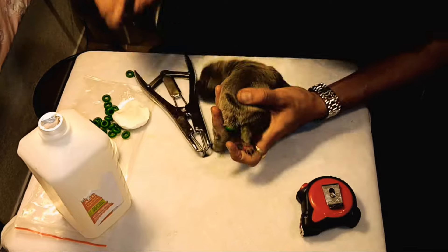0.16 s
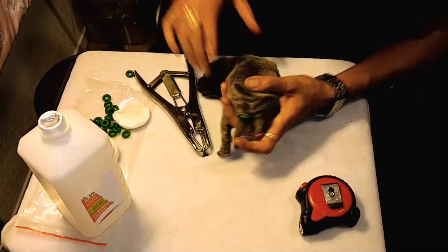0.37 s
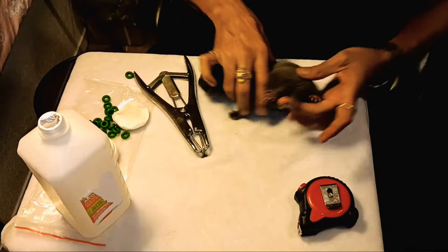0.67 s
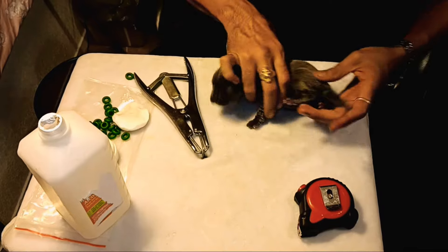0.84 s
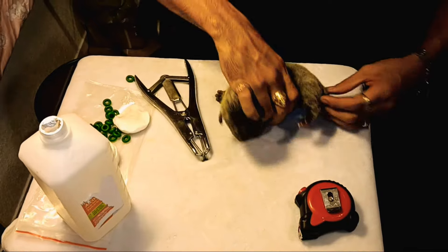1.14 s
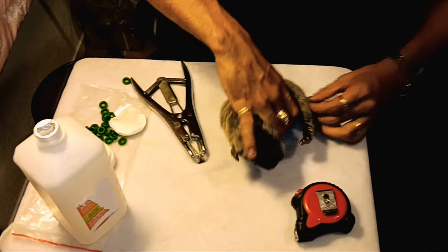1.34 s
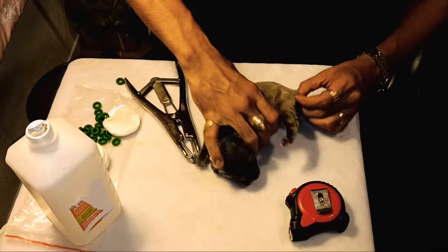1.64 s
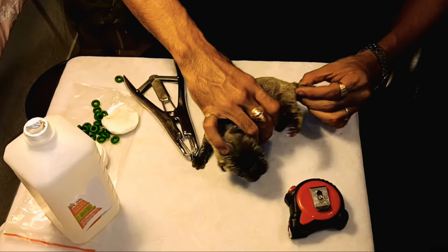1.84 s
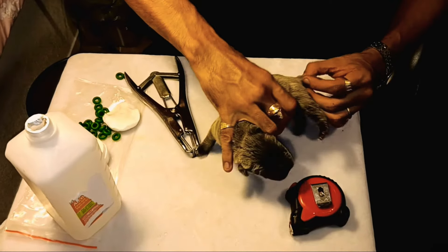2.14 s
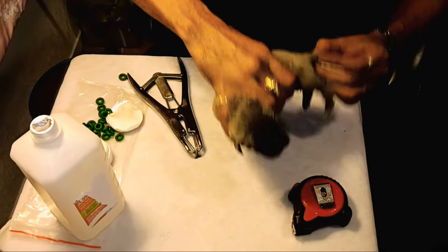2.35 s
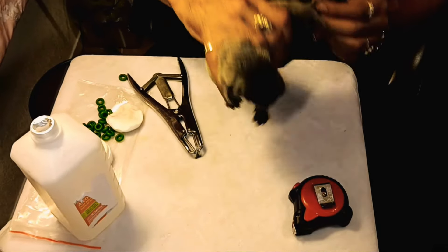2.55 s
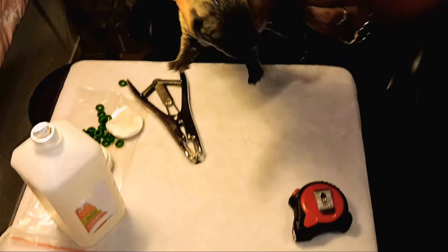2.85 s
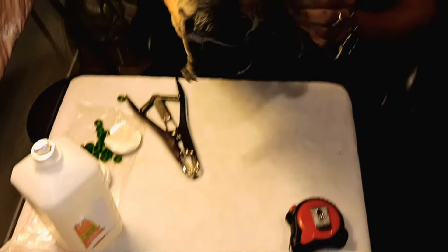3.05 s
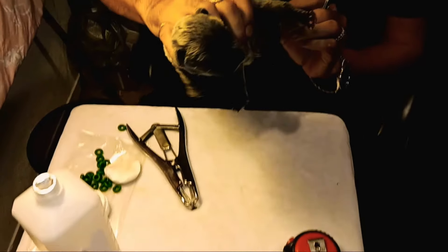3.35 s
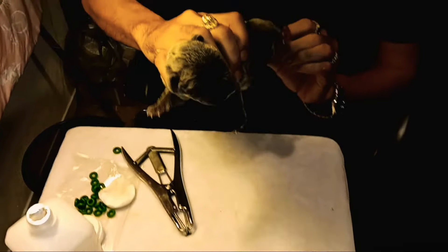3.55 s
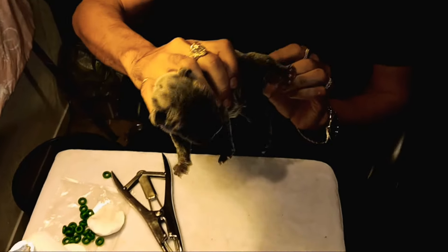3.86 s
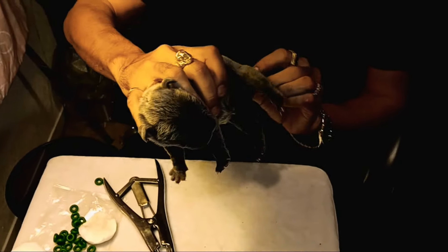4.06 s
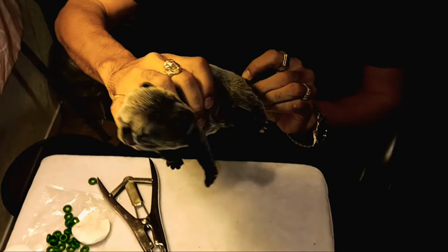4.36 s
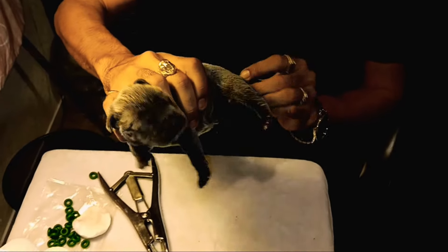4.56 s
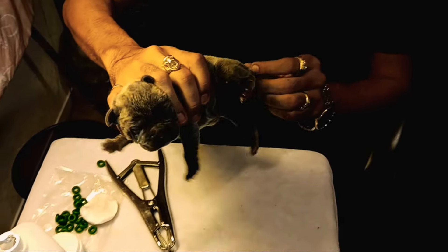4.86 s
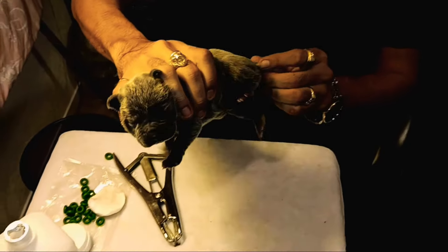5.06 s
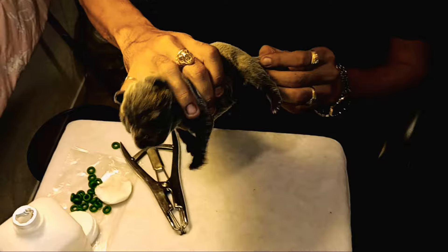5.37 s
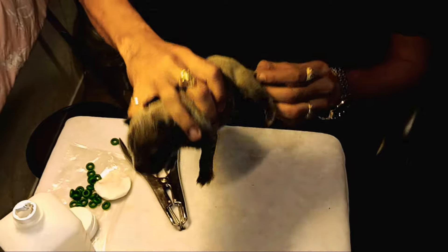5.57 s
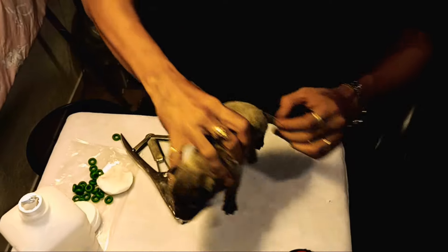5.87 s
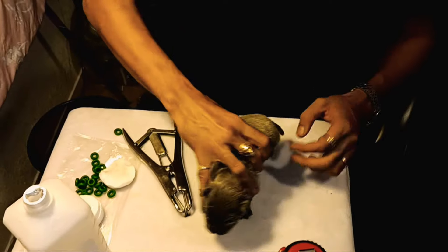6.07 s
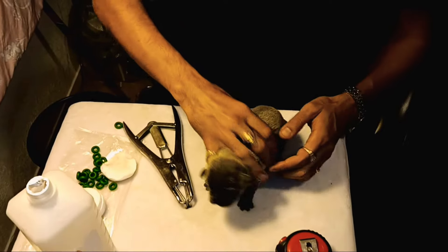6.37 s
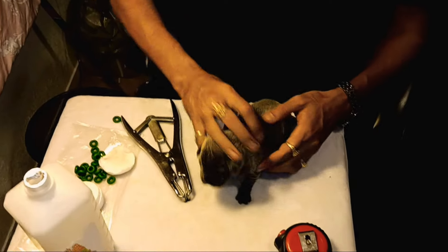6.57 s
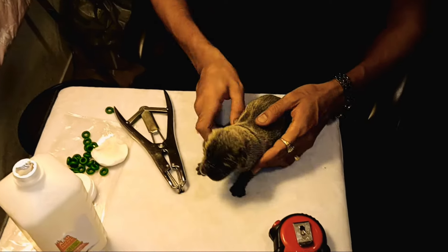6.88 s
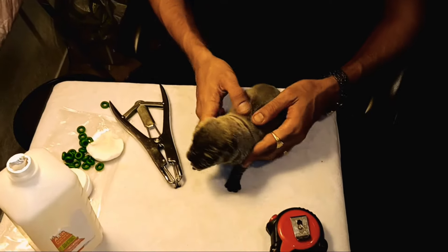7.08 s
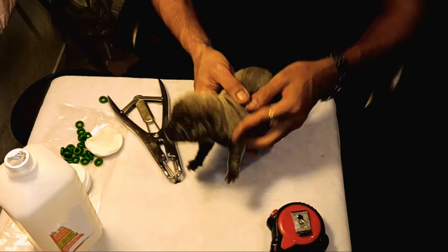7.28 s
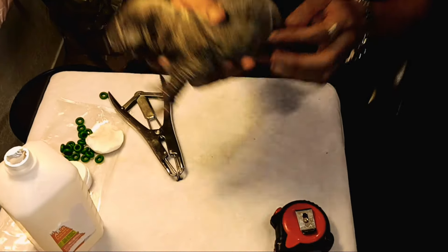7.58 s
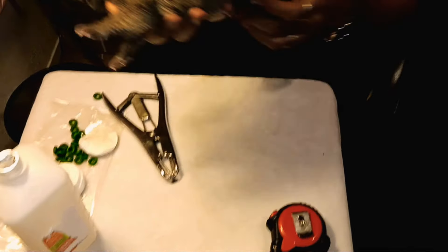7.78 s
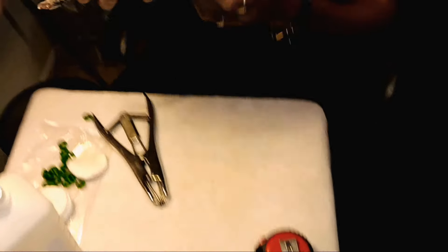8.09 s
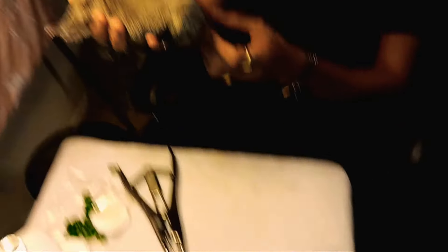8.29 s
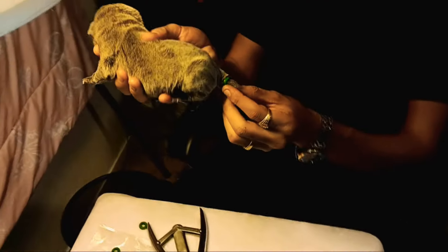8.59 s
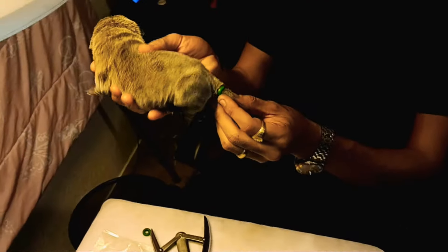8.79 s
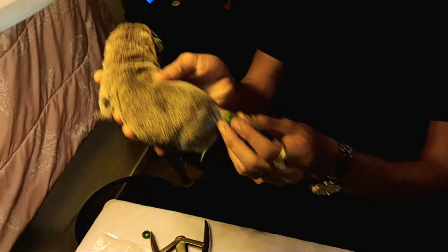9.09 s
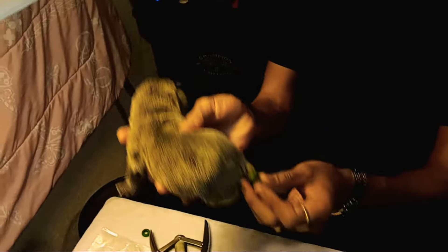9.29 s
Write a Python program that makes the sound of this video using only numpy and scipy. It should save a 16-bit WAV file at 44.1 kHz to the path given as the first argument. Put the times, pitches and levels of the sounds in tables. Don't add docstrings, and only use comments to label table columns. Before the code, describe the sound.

Close, shrill newborn puppy cries rise and fall about once a second, mixed with brief rising yelps, distant litter whimpers and tiny snuffles indoors.

```python
import sys
import numpy as np
from scipy import signal
from scipy.fft import rfft, irfft, next_fast_len
from scipy.io import wavfile
from scipy.ndimage import uniform_filter1d

SR = 44100
rng = np.random.default_rng(int(sys.argv[2]) if len(sys.argv) > 2 else 0)


def invert_db(level):
    return 10 ** (np.asarray(level, dtype=float) / 20)


def int16_out(signal):
    q = np.round(np.clip(np.atleast_2d(signal).T, -1, 1) * 32767)
    wavfile.write(sys.argv[1], SR, q.astype(np.int16))


N = 415863


def unit(x):
    return x / np.sqrt(np.mean(x ** 2) + 1e-20)


def along(points, hz):
    f, v = np.transpose(points)
    return np.interp(np.log(hz + 1), np.log(f + 1), v)


def bump(hz, centre_hz, octaves):
    return np.exp(-(np.log2(hz / centre_hz) / octaves) ** 2)


def wobble(count, rate):
    knots = int(count * rate / SR) + 4
    fine = signal.resample(rng.standard_normal(knots), 8 * knots)
    return np.interp(np.arange(count) * 8 * rate / SR, np.arange(len(fine)), fine)


def hiss(spectrum, count, low_hz=450):
    m = next_fast_len(count)
    hz = np.fft.rfftfreq(m, 1 / SR)
    gain = invert_db(along(spectrum, hz)) * hz ** 6 / (hz ** 6 + low_hz ** 6)
    return unit(irfft(rfft(rng.standard_normal(m)) * gain, m)[:count])


def patchy(x):
    z = signal.stft(x, nperseg=256)[2]
    field = uniform_filter1d(rng.standard_normal(z.shape), size=5, axis=0)
    field = uniform_filter1d(field, size=12, axis=1)
    drift_db = 4 * unit(field)
    return unit(signal.istft(z * invert_db(drift_db), nperseg=256)[1][:len(x)])


def coloured(x, gain_db):
    m = next_fast_len(N + SR // 4)
    return irfft(rfft(x, m) * invert_db(gain_db(np.fft.rfftfreq(m, 1 / SR))), m)[:, :N]


def add(track, start, sound):
    part = track[round(start * SR):][:len(sound)]
    part += sound[:len(part)]


def read(rows, extra=0):
    s, *cols = np.transpose(rows)
    t = np.arange(s[0], s[-1] + extra, 1 / SR)
    curves = [np.interp(t, s, c) for c in cols]
    return t, *[uniform_filter1d(c, size=SR // 30, mode="nearest") for c in curves]


def effort(t, hz, loss_db):
    swell_s, swell_db = 0.08, 3.5
    swell = np.clip(1 - (t - t[0]) / swell_s, 0, 1) * (t[0] > 0)
    return loss_db * np.log2(hz / hz.max()) - swell_db * swell


# frequency [Hz], level [dB].
WHEEZE_SPECTRUM = [(300, -21), (500, -4.5), (1400, 1), (2400, -12), (3500, -17.5), (6000, -48)]


def cry(t, hz, db, throat, hoarse, breath_db, shrill_db=0, low_db=(), lift_hz=2500, lift_db=0,
        fourth_db=0, dark_db=0, jaw_hz=1000, jaw_db=0, attack_s=0.026):
    n = len(t)
    top_hz = 15700
    shut_db_per_octave, open_s = 2, 0.066
    leak_db = -35
    jitter = (0.00036 + 0.0602 * hoarse) * wobble(n, 160) + 0.00286 * wobble(n, 30.45)
    hz = hz * (1 + jitter)
    phase = 2 * np.pi * np.cumsum(hz) / SR
    k = np.arange(1, int(top_hz / hz.min()) + 1)[:, None]

    def coarse(v):
        return np.broadcast_to(v, t.shape)[::8]

    def fine(v):
        return np.repeat(v, 8, axis=-1)[..., :n]

    part_hz = k * coarse(hz)
    gain_db = coarse(db) + along(throat, part_hz)
    gain_db += coarse(shrill_db) * np.clip(part_hz / 3000 - 1.6, 0, 1)
    gain_db += coarse(lift_db) * bump(part_hz, lift_hz, 0.39)
    gain_db += dark_db * bump(part_hz, 4300, 0.28) + jaw_db * bump(part_hz, jaw_hz, 0.28)
    shut_db = shut_db_per_octave * np.exp(-((t - t[0]) / open_s) ** 2) * (t[0] > 0)
    gain_db -= coarse(shut_db) * np.clip(np.log2(part_hz / 1500), 0, 2)
    gain_db[3] += fourth_db
    for i, level_db in enumerate(low_db):
        gain_db[i] = coarse(level_db)
    sway_db = 0.7 * np.minimum(k, 5)
    gain_db += sway_db * np.array([wobble(part_hz.shape[1], 57.8) for _ in k])

    gain = fine(np.float32(invert_db(gain_db) * (part_hz < top_hz)))
    angle = np.float32(k * (phase % (2 * np.pi)) + 0.3 * k ** 2 % (2 * np.pi))
    tone = np.sum(gain * np.sin(angle), axis=0) * np.sqrt(2)
    tone = tone * invert_db(2.4 * hoarse * wobble(n, 300) + 1.35 * wobble(n, 49.57))

    upper = [(f, level + 42 * np.log2(min(f, 9000) / 9000) - 6 * (f > 11000)) for f, level in throat]
    air_db = db + shrill_db + breath_db + 10 * hoarse + 2.1 * wobble(n, 27.0)
    air = invert_db(air_db) * patchy(hiss(upper, count=n)) * (1 + 2.1 * np.sin(phase))
    dull = [(f, level - 8 * (f > 3700)) for f, level in throat]
    rasp = hoarse * invert_db(db + 6.0) * hiss(dull, count=n)
    leak = fine(invert_db(gain_db[0] + leak_db)) * hiss(WHEEZE_SPECTRUM, count=n)

    rise = (t - t[0]) / (attack_s if t[0] else 0.002)
    edge = np.clip(np.minimum(rise, (t[-1] - t) / 0.011), 0, 1)
    return edge * (tone + air + rasp + leak)


# frequency [Hz], level [dB per Hz].
FLOOR_SPECTRUM = [(15, -18.5), (25, -12), (69, -10), (169, -13.5), (198, -13), (305, -11.5), (378, -24.5),
                  (2170, -20.5), (3630, -24.5), (15500, -39)]


def floor():
    common = hiss(FLOOR_SPECTRUM, count=N, low_hz=18)
    ports = [0.48 * common + 0.89 * hiss(FLOOR_SPECTRUM, count=N, low_hz=20.96) for _ in range(2)]
    return invert_db(-74.5) * np.array(ports)


# time [s], pitch [Hz].
YELP_PITCHES = [
    [(0.0, 1236), (0.025, 1178), (0.045, 1021)],
    [(0.37, 762), (0.412, 1035), (0.432, 1113), (0.52, 1065)],
    [(0.79, 556.4), (0.83, 631), (0.9, 736), (0.928, 763)],
    [(1.23, 535), (1.29, 600), (1.33, 623), (1.37, 600)],
    [(1.71, 550), (1.736, 581), (1.79, 596)],
    [(2.13, 623), (2.222, 694.5), (2.28, 719.5)],
    [(2.66, 533), (2.744, 585), (2.78, 600.6)],
    [(3.15, 542), (3.246, 614.6), (3.335, 590.4)],
    [(3.71, 510), (3.764, 577), (3.838, 602), (3.87, 577)],
    [(4.24, 516), (4.334, 652), (4.398, 673), (4.43, 604)],
    [(4.9, 499), (5.002, 515.4), (5.08, 470.4), (5.135, 480.6)],
    [(5.54, 494), (5.574, 531.6), (5.656, 570), (5.72, 556)],
    [(6.035, 438), (6.075, 481.5), (6.135, 555.6), (6.168, 559)],
]
# level [dB], shrillness [dB].
YELP_STRENGTHS = [(-30.5, 8.5), (-31.5, 0), (-36, 9.5), (-41.5, 10.5), (-41.5, 14), (-34.5, 6.5), (-41, 9),
                  (-40, 6), (-40, 3.5), (-30.5, 5), (-42.5, -4.5), (-43.5, 2.5), (-39.5, -5)]
# pitch [Hz], level step [dB], length [s].
YELP_FALLS = [(624, -10.5, 0.033), (670, -11, 0.044), (600, -10.5, 0.035), (482, -14.5, 0.03),
              (487, -5.5, 0.022), (483, -13, 0.028), (408, -16, 0.047), (388, -9, 0.038), (362, -8, 0.028),
              (485, -9.5, 0.033), (312.7, 5, 0.012), (356, -5.5, 0.022), (487, -2.5, 0.01)]
# mouth resonance [Hz], its lift [dB], hoarseness [0-1].
YELP_MANNERS = [(2837, 24, 0.07), (3600, 6.5, 0.02), (2700, 8.5, 0.1), (3780, -11, 0.2), (3970, 7.5, 0.07),
                (4000, -6.5, 0.08), (3110, 6, 0.06), (3600, 1, 0.11), (4130, 8.5, .1), (4080, 5, 0),
                (3640, 9, 0.06), (3000, 1.5, 0.05), (3810, -81, 0.23)]
YELP_DARKNESS_DB = [3.5, -10, -5, 1, -4, 2.5, -0.5, 3, -1, -2.5, -3.5, 0, -8]
# frequency [Hz], lift [dB].
YELP_JAWS = [(2400, 1), (1100, -1.5), (2270, 6), (1200, 1), (2460, 6.5), (2780, 10.5), (2400, -2),
             (2780, 7.5), (2300, 4), (2000, 1.5), (1000, -3), (1150, -1), (1050, 4)]
# frequency [Hz], level [dB].
BRIGHT_THROAT = [(300, -17.5), (600, -8), (1100, 3), (2400, -4.5), (3200, -15), (4200, -19), (5400, -18.5),
                 (6500, -23.5), (7900, -21.5), (10000, -21), (13000, -33), (15800, -33)]


def bright():
    effort_db, opens_db, breath_db = 27.5, 4, -31
    track = np.zeros(N)
    yelps = zip(YELP_PITCHES, YELP_STRENGTHS, YELP_FALLS, YELP_MANNERS, YELP_DARKNESS_DB, YELP_JAWS)
    for rows, (db, shrill_db), (end_hz, step_db, length), manner, dark_db, (jaw_hz, jaw_db) in yelps:
        lift_hz, lift_db, hoarse = manner
        t, hz = read(rows, length + 0.012)
        db = db + effort(t, hz, effort_db)
        shrill_db = shrill_db + opens_db * ((t - t[0]) / (t[-1] - t[0]) - 0.5)
        fall = np.clip((t - rows[-1][0]) / length, 0, 1)
        hz = hz + fall * (end_hz - hz)
        onset = 0.29 * np.exp(-((t - t[0]) / 0.036) ** 2) * (t[0] > 0)
        sound = cry(t, hz, db + step_db * np.sqrt(fall), BRIGHT_THROAT, 0.5 * fall + hoarse + onset,
                    breath_db, shrill_db, lift_hz=lift_hz, lift_db=lift_db, dark_db=dark_db,
                    jaw_hz=jaw_hz, jaw_db=jaw_db)
        add(track, t[0], sound)
    return track


# start [s], length [s], level [dB].
SNIFF_TIMES = [(0.04, 0.054, -56.5), (0.507, 0.053, -60.5), (1.983, .08, -66), (3.298, .07, -58),
               (5.136, 0.057, -57.5), (6.382, .04, -59), (6.9, 0.045, -63.5), (7.371, .06, -63),
               (7.6, .1, -61), (7.97, .05, -59), (8.311, .07, -65), (8.82, 0.08, -60.5),
               (9.358, .05, -62.5)]
# frequency [Hz], level [dB].
SNIFF_SPECTRUM = [(3000, -21), (5000, -6), (9000, -2), (12500, 0), (15500, -8.5)]
# start [s], length [s], nose [dB], throat [dB].
PUFFS = [(1.864, 0.4, -56.5, -67.5), (2.535, 0.045, -60, -72), (2.635, 0.04, -87, -51.5),
         (3.929, 0.16, -72, -70), (4.018, 0.33, -65.5, -86), (6.198, 0.19, -60, -60.5),
         (6.359, 0.077, -55, -64), (6.451, 0.049, -56.5, -59.5), (6.622, 0.046, -64, -66),
         (7.156, 0.26, -83, -74), (7.352, 0.09, -54, -53), (7.48, 0.054, -60.5, -46),
         (8.04, 0.215, -69, -84), (8.289, 0.09, -52.5, -45), (8.743, 0.18, -51, -57.5),
         (8.858, 0.34, -54, -69), (6.501, .14, -68.5, -82), (9.356, 0.058, -55.5, -59),
         (0.793, .05, -52, -64.5), (6.89, 0.054, -48, -55)]
# frequency [Hz], level [dB].
NOSE_SPECTRUM = [(2500, -29), (4000, 0), (6200, 2.5), (8000, 3), (10000, 5), (12500, -8), (15800, -28.5)]


def snuffle():
    track = np.zeros(N)
    for start, length, nose_db, throat_db in PUFFS:
        n = round(length * SR)
        nose = invert_db(nose_db + 2.8 * wobble(n, 26.6)) * patchy(hiss(NOSE_SPECTRUM, count=n))
        throat = invert_db(throat_db + 5.4 * wobble(n, 39.1)) * hiss(WHEEZE_SPECTRUM, count=n, low_hz=285)
        add(track, start, signal.windows.tukey(n, 0.85) * (nose + throat))
    for start, length, db in SNIFF_TIMES:
        n = round(length * SR)
        add(track, start, invert_db(db) * np.hanning(n) * hiss(SNIFF_SPECTRUM, count=n))
    tick_s, tick_db, tick_t60 = 3.008, -37, 0.015
    t = np.arange(SR // 20) / SR
    click = hiss([(3000, -32), (3800, -8.5), (5300, -4), (6500, -29.5)], count=len(t))
    add(track, tick_s, invert_db(tick_db - 60 * t / tick_t60) * click)
    return track


# time [s], pitch [Hz].
SQUEAL_PITCHES = [
    [(0.11, 551.4), (0.182, 728), (0.222, 808), (0.27, 808.5), (0.36, 778.5), (0.43, 791), (0.492, 764)],
    [(0.975, 618), (1.06, 819), (1.117, 762), (1.19, 733.4), (1.268, 887), (1.321, 897), (1.5, 798.5),
     (1.62, 771), (1.69, 700.5)],
    [(2.04, 510.3), (2.082, 674), (2.134, 853), (2.286, 849.5), (2.316, 926), (2.382, 992), (2.438, 966),
     (2.51, 848)],
    [(2.82, 619), (2.904, 1016), (2.968, 1060), (3.03, 974), (3.09, 800)],
    [(3.39, 683), (3.416, 771), (3.45, 963), (3.472, 1029), (3.52, 1086), (3.64, 929), (3.724, 1006),
     (3.75, 986), (3.78, 906)],
    [(4.19, 627), (4.264, 894), (4.292, 986), (4.33, 967), (4.434, 845), (4.626, 955), (4.738, 813.4),
     (4.86, 873)],
    [(5.21, 528), (5.268, 676), (5.326, 845), (5.366, 851.5), (5.47, 815.8), (5.61, 792.3)],
    [(6.65, 580), (6.766, 956.7), (6.942, 685), (7.046, 752.6), (7.1, 687)],
    [(7.51, 615.4), (7.574, 935), (7.61, 1043), (7.76, 816.3), (7.858, 878.4), (7.96, 790.4)],
    [(8.32, 632.5), (8.404, 1000), (8.456, 1051), (8.624, 922), (8.7, 843.5)],
    [(9.02, 594), (9.08, 797), (9.14, 893), (9.208, 824.6), (9.31, 733)],
]
# first, second and third partial [dB], top resonance [dB].
SQUEAL_VOICES = [(-36.5, -41, -47, -52), (-39, -45, -49.5, -51), (-36.5, -43.5, -53, -49),
                 (-33, -46, -55.5, -50), (-32.5, -41.5, -55, -43), (-39, -36, -41.5, -43.5),
                 (-41, -34, -37, -45), (-36.5, -34.5, -39.5, -46), (-35, -35.5, -40.5, -42),
                 (-32, -39.5, -40.5, -40.5), (-37, -36, -43, -44)]
SQUEAL_EFFORT_DB = (9.8, 0.39, 4.9, 6.3)
# pitch [Hz], level step [dB], length [s].
SQUEAL_GRUNTS = [(618, 2, 0.02), (581, 0, 0.037), (626, 1, 0.0293), (676, -4.5, 0.046), (688, 7, 0.018),
                 (711, 3.5, 0.04), (660, 5, 0.04), (610, -1.5, 0.04), (653, 3, 0.046), (676, -1, 0.038),
                 (633, -4, 0.042)]
# resonance [Hz], lift [dB].
TONGUES = [(3800, -23), (4570, -2), (5030, -3.5), (5010, -6.5), (4910, 17), (4880, -11), (5100, -3),
           (5340, -12), (4230, 4.5), (5430, -7.5), (4330, -13)]
TONGUE_MOVES_DB = [6, -21, -6, 14, -20, -5.5, -6, 2, 1, 8, 1]
SQUEAL_FOURTH_DB = [-1, -4, 1.5, 1, 1.5, 1.5, 3.5, -1, -2, -1, 0.5]
# time [s], half length [s], first partial [dB], upper partials [dB].
BREATH_SURGES = [(0.25, 0.055, -4, -11), (1.317, 0.049, 10.5, -3), (4.663, 0.021, -6.5, -3.5),
                 (6.953, 0.03, 4, -2), (9.202, 0.043, 4, 1), (8.367, 0.046, -6, -1), (5.6, 0.022, 1, 4),
                 (2.427, 0.02, -4, -5), (2.97, 0.033, -2.5, -4), (3.597, 0.076, 2.5, 8),
                 (3.72, 0.12, -2.5, 4), (2.865, .01, -3, -0.5), (2.888, 0.008, 4.5, -7.5),
                 (2.903, .005, -11, -2), (2.914, 0.0066, 4.5, -7), (5, 0.014, -3.5, -3.5),
                 (7.95, 0.0077, -1.5, -4), (3.05, 0.011, 2, 2), (6.72, 0.036, -5, -4),
                 (7.93, .015, -1.5, 1), (5.4, 0.023, -7, 8), (5.58, 0.033, 11, -3.5),
                 (4.3, 0.042, 2.5, 15.5), (0.31, 0.049, 3, 1), (0.83, 0.035, 5, 4), (2.33, 0.017, -5.5, 1),
                 (3.47, .03, 2, -2.5), (3.55, 0.066, -3, 4.5), (4.79, .02, -3.5, 7.5), (4.74, .015, 1, 7),
                 (7.79, .03, -6.5, 1), (8.5, 0.043, -1, -0.5), (9.12, 0.038, -2, -1),
                 (1.607, 0.078, 3.5, 3), (4.495, 0.031, -0.5, 0), (4.622, 0.037, 10.5, 0),
                 (5, 0.13, -3.5, -4.5), (7.735, 0.082, -1, 3), (9.3, 0.03, 4, 0), (8.62, 0.064, -8, 5)]
# frequency [Hz], level [dB].
HELD_THROAT = [(500, -19), (1000, 2.5), (2000, -0.5), (3300, -11), (4000, -23.5), (5300, -26.5),
               (6300, -26.5), (7500, -35.5), (9800, -29.5), (11500, -41.5), (13000, -60), (15800, -71)]


def held():
    breath_db, grunt_low_db = -38, 4
    track = np.zeros(N)
    squeals = zip(SQUEAL_PITCHES, SQUEAL_VOICES, SQUEAL_GRUNTS, TONGUES, SQUEAL_FOURTH_DB, TONGUE_MOVES_DB)
    for rows, voice, (end_hz, step_db, length), (tongue_hz, tongue_db), fourth_db, moves_db in squeals:
        t, hz = read(rows, length)
        levels = [db + effort(t, hz, loss_db) for db, loss_db in zip(voice, SQUEAL_EFFORT_DB)]
        first, second, third, top_db = levels
        low, high = np.zeros((2, len(t)))
        for s, half, low_db, high_db in BREATH_SURGES:
            surge = np.exp(-((t - s) / half) ** 2)
            low += low_db * surge
            high += high_db * surge
        broken = np.clip((t - rows[-1][0]) / 0.0052, 0, 1)
        onset = 0.3 * np.exp(-((t - t[0]) / 0.06) ** 2)
        hz = hz + broken * (end_hz - hz)
        break_db = broken * (step_db + grunt_low_db)
        lowest = (first + low + break_db, second + high + break_db)
        upper = third + high / 2 - along(HELD_THROAT, 3 * hz) + broken * step_db
        shrill_db = top_db + high / 2 + 18.5 - upper
        lift_db = tongue_db + moves_db * ((t - t[0]) / (t[-1] - t[0]) - 0.5)
        sound = cry(t, hz, upper, HELD_THROAT, 0.33 * broken + onset, breath_db, shrill_db, lowest,
                    lift_hz=tongue_hz, lift_db=lift_db, fourth_db=fourth_db)
        add(track, t[0], sound)
    return track


# start
# [s], end [s], first pitch [Hz], last pitch [Hz], level [dB].
FAR_WHIMPERS = [(1.836, 2.065, 480, 520, -52), (2.171, 2.292, 480, 480, -52), (3.93, 4.2, 525, 350, -57.5),
                (6.22, 6.44, 335, 345, -65), (6.44, 6.665, 366, 318, -63), (6.22, 6.418, 513, 530, -56),
                (1.5, 1.61, 567, 467, -49), (7.139, 7.363, 522, 515, -49), (8.079, 8.298, 510, 502, -52),
                (8.748, 8.87, 475, 440, -50.5), (8.88, 9.02, 420, 500, -77), (6.168, 6.225, 490, 465, -35),
                (9.12, 9.28, 440, 420, -49.5), (7.76, 7.95, 430, 430, -56.5), (8.44, 8.66, 440, 430, -63),
                (0.88, 1.4, 580, 460, -52.5), (9.32, 9.42, 420, 300, -53.5), (7.35, 7.43, 520, 410, -52.5),
                (5.3, 5.5, 470, 480, -57.5), (1.0, 1.12, 530, 560, -55.5)]
# lift near 3 kHz [dB], hoarseness [0-1].
FAR_VOICES = [(4.5, 0.07), (0, 0.16), (-5.5, 0.02), (12, .45), (14, .14), (7, 0.4), (1, 0.2), (-20, 0.08),
              (-7, 0.06), (-12.5, 0.2), (1, 0), (-5, 0.2), (-15, .2), (-8, 0.7), (-17, .4), (10.5, 0),
              (-3, .4), (-8, .4), (-8, 0.4), (-7, .3)]
# frequency [Hz], level [dB].
FAR_THROAT = [(300, -2.5), (1000, -0.5), (2100, -5.5), (2700, -12), (4500, -38.5), (7500, -40),
              (9300, -26.5), (11000, -35), (15800, -66)]


def far():
    tire_db, droop_db, low_first_db = 1, 37, 9
    track = np.zeros(N)
    for (start, end, first_hz, last_hz, db), (lift_db, hoarse) in zip(FAR_WHIMPERS, FAR_VOICES):
        t = np.arange(start, end, 1 / SR)
        n = len(t)
        u = (t - start) / (end - start)
        glide = first_hz + (last_hz - first_hz) * u ** 1.5
        hz = glide * (1 + 0.025 * (np.sin(np.pi * u) - 0.7))
        db = db - tire_db * u + droop_db * min(np.log2(last_hz / first_hz), 0) * u ** 2
        first = db - 8.5 + (low_first_db + 4 * wobble(n, 12)) * (first_hz < 400)
        sound = cry(t, hz, db + 1 + 1.4 * wobble(n, 18.2), FAR_THROAT, hoarse, breath_db=-27.5,
                    low_db=[first], attack_s=0.0099, lift_hz=3240, lift_db=lift_db)
        add(track, t[0], sound)
    return track


# start [s], end [s],
# pitch [Hz], level [dB], unsteadiness [rad].
HUM_NOTES = [(3.38, 3.6, 304, -51, 0.24), (5.3, 5.458, 304, -52, 0.35), (5.131, 5.198, 350, -48, 4.3),
             (5.74, 5.82, 400, -52, 6.5), (6.837, 6.96, 435, -44.5, 1.8), (7.37, 7.557, 310, -57, 0.93),
             (8.7, 8.9, 450, -57.5, 5.9), (8.52, 8.72, 315, -56, 1.4), (6.36, 6.46, 365, -50, 1.6),
             (8.27, 8.32, 1000, -42.5, 2.2), (8.52, 8.62, 510, -61, 3.1), (2.78, 2.86, 420, -55.5, 1.4)]


def hums():
    track = np.zeros(N)
    for start, end, hz, db, unsteady in HUM_NOTES:
        t = np.arange(start, end, 1 / SR)
        swell = np.sin(np.pi * (t - start) / (end - start))
        add(track, start, invert_db(db) * swell * np.sin(2 * np.pi * hz * t + unsteady * wobble(len(t), 30)))
    return track


# frequency [Hz], time to fall 60 dB [s].
WALL_DECAY = [(300, 0.21), (1500, 0.26), (4000, 0.2), (10000, 0.16)]
# frequency [Hz], echo level [dB].
SOFT_CLOTH = [(1200, 0.5), (2500, -3), (6000, 0.5), (12000, -2.5)]


def room(x, wet_db, lag, left_db):
    even_hz, fade_s = 70, 0.3
    lead = SR // 50
    hz, t, z = signal.stft(rng.standard_normal((2, SR // 3)), SR, nperseg=256)
    decay_db = along(SOFT_CLOTH, hz)[:, None] - 60 * t / along(WALL_DECAY, hz)[:, None]
    tail = signal.istft(z * invert_db(decay_db), SR, nperseg=256)[1]
    tail = np.pad(tail, ((0, 0), (130, 0))) * invert_db(wet_db - 2.5) / np.linalg.norm(tail[0])
    tail[0, lag] = tail[1, 0] = 1
    answer = rfft(np.pad(tail, ((0, 0), (lead, 0))), SR)
    power = uniform_filter1d(np.abs(answer) ** 2, size=even_hz, axis=1)
    answer /= np.sqrt(power / (1 + invert_db(2 * wet_db)))
    fade = np.clip(3 - 3 * np.arange(SR // 2) / (fade_s * SR), 0, 1) ** 2
    tail = irfft(answer, SR)[:, :SR // 2] * fade * invert_db([[left_db / 2], [-left_db / 2]])
    return signal.oaconvolve(x[None], tail, axes=1)[:, lead:][:, :N]


# frequency [Hz], width [Hz], lift [dB].
STANDING_WAVES = [(734, 99, 2.5), (936.4, 40, 8.5), (1048, 52, 2.5), (1635, 50, 2), (1952, 12, 2),
                  (2390, 310, 1.5)]


def standing_waves(x):
    def lift_db(f):
        return sum(db * np.exp(-((f - hz) / width) ** 2) for hz, width, db in STANDING_WAVES)
    return coloured(x, lift_db)


# time [s], left over right [dB].
HAND_PLACE = [(0, 0.5), (1.201, 0.5), (2.2, 2), (3, 1), (3.6, 4), (4.3, 3.5), (4.7, 1.5), (5.6, 1),
              (6.8, 2), (7.7, 2.5), (8.5, 1.5), (9.43, 2)]


def scene():
    s, place_db = np.transpose(HAND_PLACE)
    turn_db = np.interp(np.arange(N) / SR, s, place_db - place_db.mean())
    voices = room(bright(), wet_db=-4.0, lag=45, left_db=1.8)
    voices += room(snuffle(), wet_db=0, lag=45, left_db=1.5)
    voices += room(held(), wet_db=0.7, lag=43, left_db=2.6) * invert_db([turn_db / 2, -turn_db / 2])
    voices += room(far(), wet_db=0, lag=45, left_db=1.0)
    voices += invert_db(1.5) * room(hums(), wet_db=-5, lag=60, left_db=1.0)
    return standing_waves(voices) + floor()


def roll_off(x):
    return signal.sosfilt(signal.butter(12, 15690, fs=SR, output="sos"), x)


def record(dry):
    def table_db(hz):
        cancelled = 6 * np.exp(-((hz - 5300) / 800) ** 2) + 5 * np.exp(-((hz - 7600) / 500) ** 2)
        return 3 * np.exp(-((hz - 8800) / 400) ** 2) - cancelled
    notched = coloured(dry, table_db)
    squeezed = notched / (1 + np.abs(notched / 1.5) ** 3) ** (1 / 3)
    return roll_off(squeezed)


dry = scene()
out = record(dry)
int16_out(out)
```